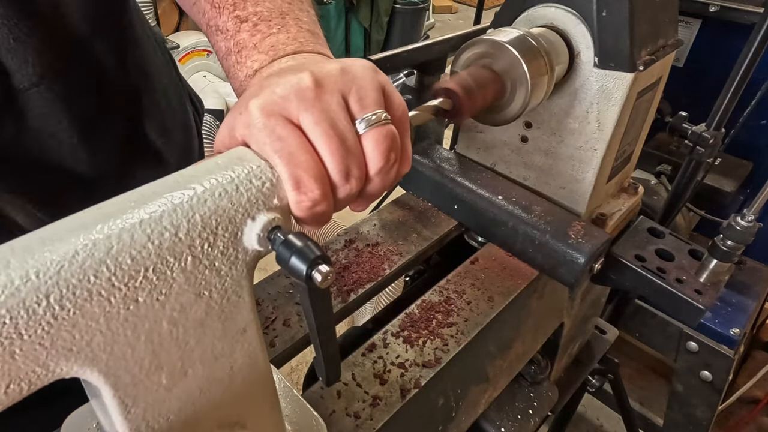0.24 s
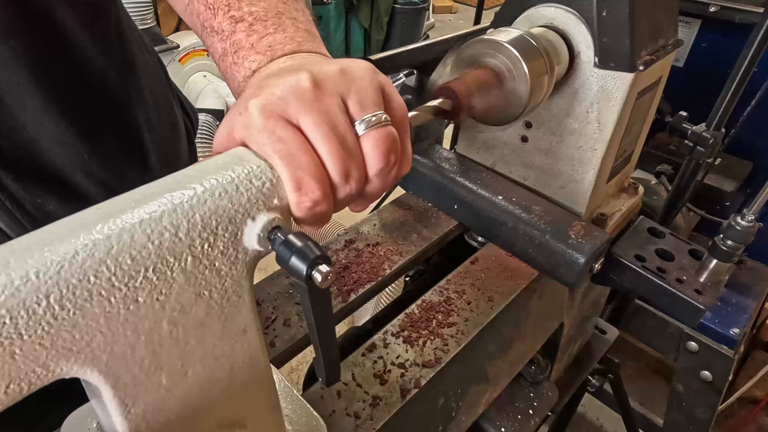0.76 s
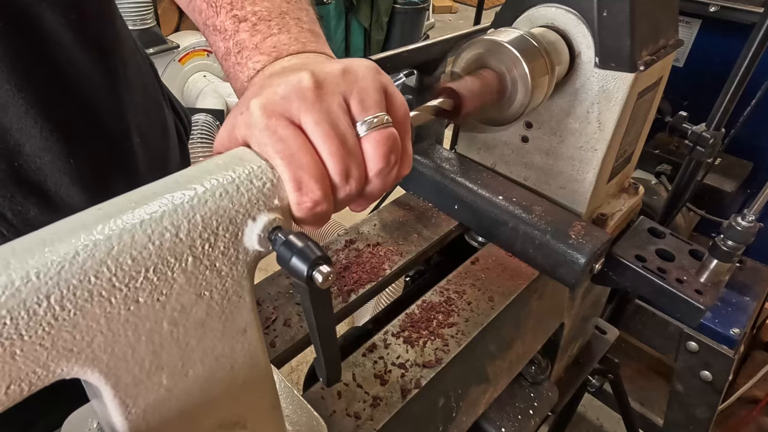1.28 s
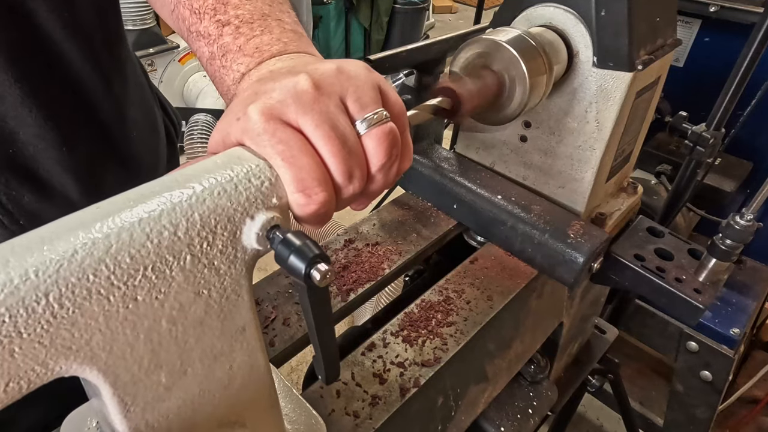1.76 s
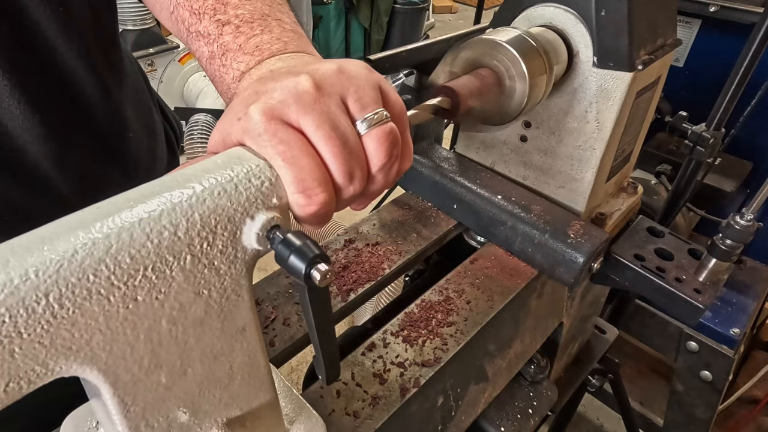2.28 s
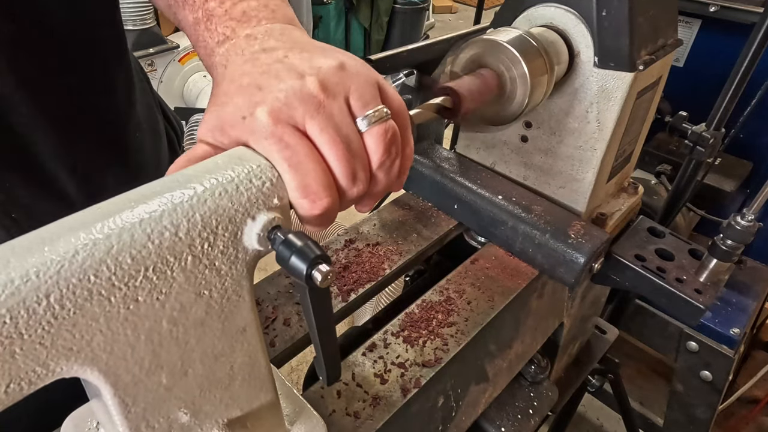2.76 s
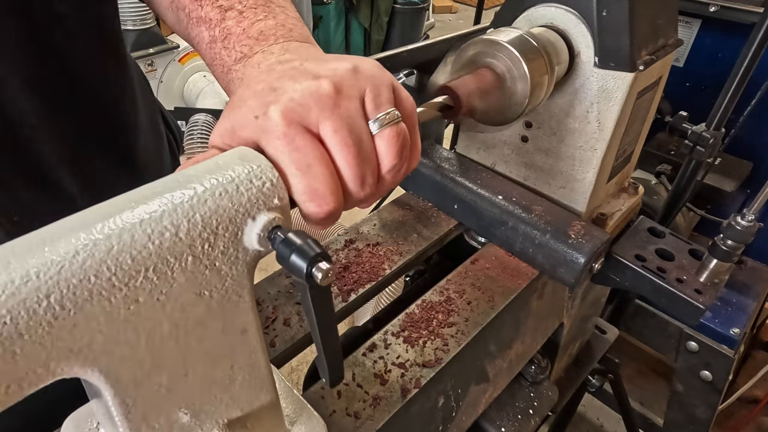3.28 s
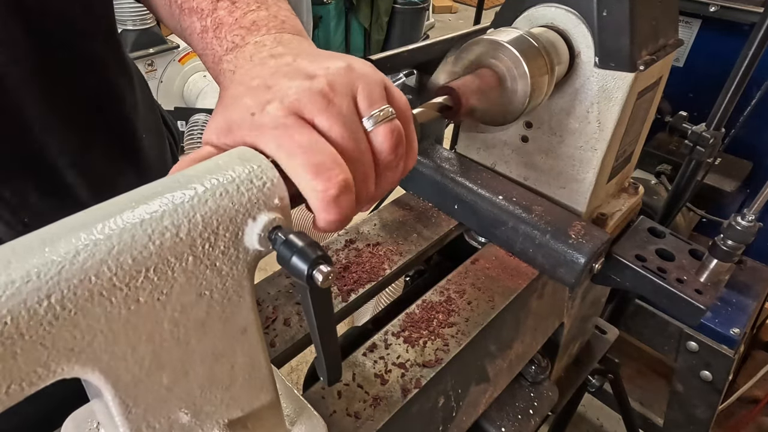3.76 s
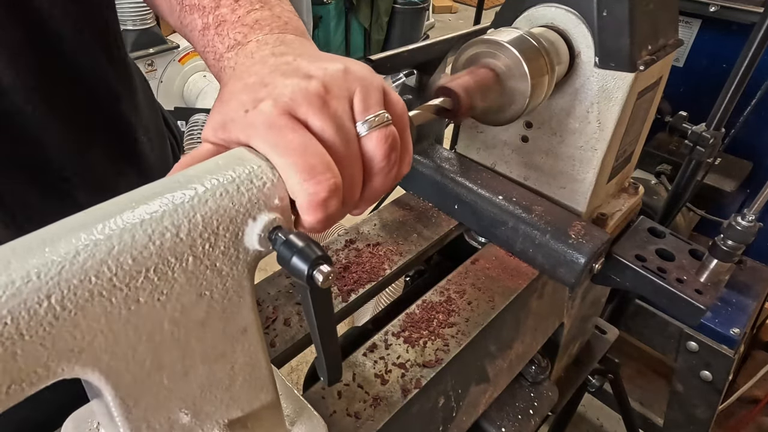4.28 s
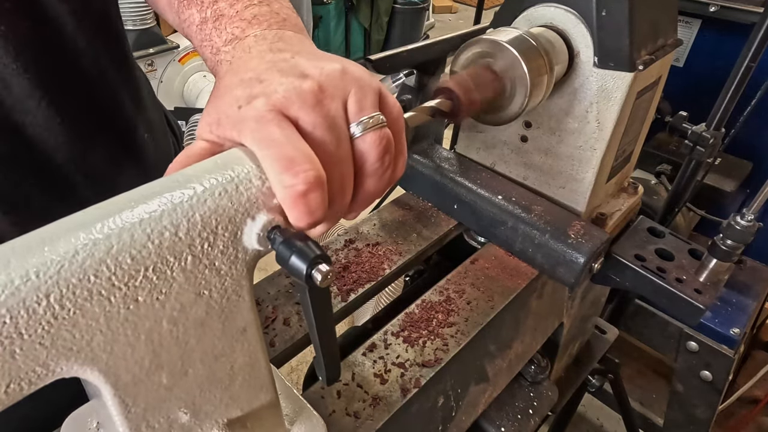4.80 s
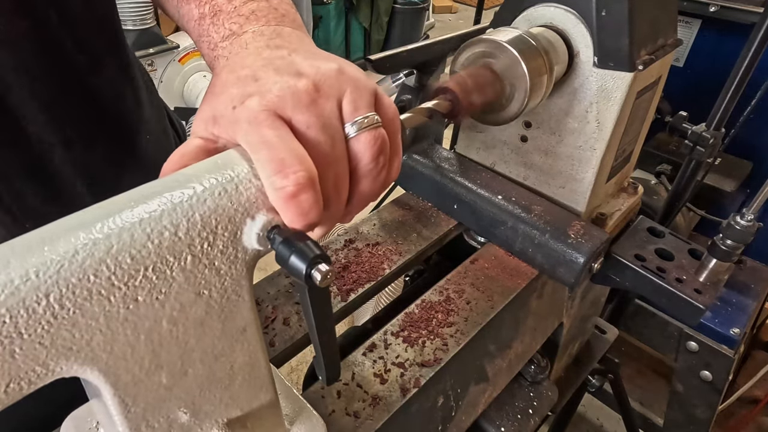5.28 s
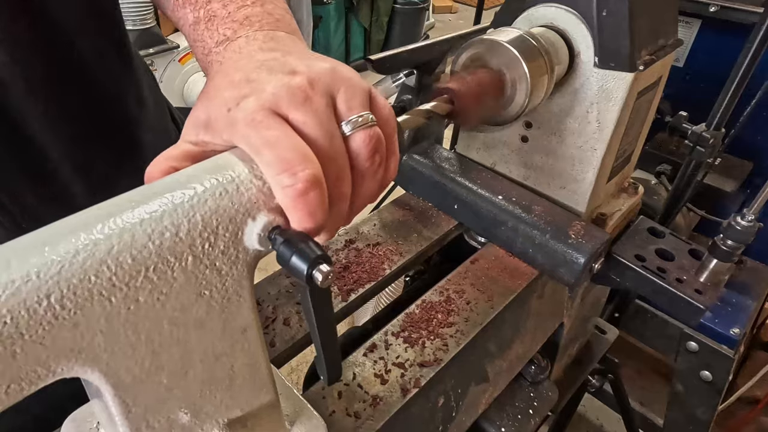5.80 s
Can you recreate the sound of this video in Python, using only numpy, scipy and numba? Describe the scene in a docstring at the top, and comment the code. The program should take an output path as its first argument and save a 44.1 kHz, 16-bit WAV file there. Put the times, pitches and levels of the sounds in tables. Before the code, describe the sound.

In a small workshop, a wood lathe drones while a drill bit scrapes into the spinning wood, close to the microphone. Sharp squeaks stutter at first as the lathe gathers speed. As the hole deepens, the sound grows hollow, with lower creaks and small crackling snaps of chips. Finally the bit breaks into a shrill, rapidly pulsing squeal, the loudest part.

```python
"""A twist drill, hand-fed from a lathe's tailstock, bores a spinning hardwood blank in a small workshop.
The bit starts out squeaking on every turn as the spindle gathers speed; the lips scrape the same grain
once a turn and the chuck drones. Chips tear, single squeaks break in, a thin whistle is gone by 2 s.
From 2.2 to 3.1 s the hole deepens and sounds hollower; squeaks become creaks. From 5.1 s the bit binds
and squeals on every turn. A close microphone limits the peaks throughout."""
import sys
import numpy as np
from scipy import signal
from scipy.fft import rfft, irfft, next_fast_len
from scipy.io import wavfile
from scipy.ndimage import map_coordinates
from numba import njit

SR = 44100
rng = np.random.default_rng(int(sys.argv[2]) if len(sys.argv) > 2 else 0)


def master(y):
    """Save y as 16-bit WAV."""
    cut = np.clip(np.atleast_2d(y).T, -1, 1)
    pcm = np.round(cut * 32767)  # scale
    wavfile.write(sys.argv[1], SR, pcm.astype(np.int16))


N = 266364
T = np.arange(N) / SR

# hand feed: time_s, scrape_db, body_db
FEED = [(0, -43, -56), (.25, -38, -60.5), (.42, -48, -54.5), (.7, -44.5, -53.5), (.85, -33, -51.5),
        (1.15, -43.5, -57), (1.4, -40.5, -51), (1.75, -46, -49), (2.14, -37, -43), (2.68, -39, -43),
        (2.8, -45, -47.5), (3.0, -39, -47.5), (3.5, -39.5, -47.5), (3.87, -44, -50.5), (4.45, -41.5, -49),
        (4.9, -38.5, -47.5), (5.4, -36.5, -45), (6.04, -40, -51.5)]
# hole, 0 shallow to 1 deep: time_s, depth
DEPTH = [(2.2, 0), (3.1, 1)]
# binding bit; throaty at the hole's mouth, hoarse deep inside, piercing at the bottom: freq_hz, gain_db
SQUAWK_SPECTRUM = [(500, -50), (900, -32), (1350, -6), (1680, 1), (1830, -0.5), (2050, 0.5), (2400, -11),
                   (3200, -6.5), (3650, -0.5), (4100, -3.5), (4750, -20.5), (5700, -8), (6150, -12.5),
                   (6650, -17), (7350, -13), (8200, -28), (10000, -25.5), (11800, -18.5), (14000, -40)]
CREAK_SPECTRUM = [(150, -26), (600, -39), (900, -28), (1200, -3), (1480, 2.5), (2000, -0.5), (2600, -14.5),
                  (3100, 5.5), (3800, -12.5), (4450, -6), (5200, -26), (6100, -10.5), (7300, -20),
                  (10000, -27.5), (12000, -21.5), (14000, -44)]
SQUEAL_SPECTRUM = [(100, -18.5), (500, -27.5), (900, -20.5), (1400, -6.5), (1900, 3.5), (2450, -8.5),
                   (3000, -5.5), (3800, -3), (4400, -7), (5050, -26), (6000, -6), (6700, -11), (7900, -14),
                   (10300, -30), (11900, -16.5), (14000, -42.5)]
# voices: spectrum, roughness, rub_db
SQUAWK = (SQUAWK_SPECTRUM, 0.8, -9.5)
CREAK = (CREAK_SPECTRUM, 1.48, -9)
SQUEAL = (SQUEAL_SPECTRUM, 0.75, -7.5)
SHALLOW_GLIDE_S, DEEP_GLIDE_S = 0.007, 0.0044  # a deep hole steadies the bit sooner


def undb(db):
    """Decibels to gain."""
    return 10 ** (np.asarray(db) / 20)


def unit(x):
    """Scale to rms 1."""
    return x / np.sqrt(np.mean(x ** 2))


def curve(table, column=1):
    """One column, interpolated over the scene."""
    rows = np.array(table)
    return np.interp(T, rows[:, 0], rows[:, column])


def row_at(table, time_s):
    """All value columns, interpolated at time_s."""
    times, *columns = np.transpose(table)
    return [np.interp(time_s, times, column) for column in columns]


def gain_at(hz, spectrum):
    """Gain of a (freq_hz, gain_db) spectrum at hz."""
    freq_hz, gain_db = np.transpose(spectrum)
    return undb(np.interp(np.log(hz + 1e-9), np.log(freq_hz), gain_db))


def colour(x, spectrum, resonances=()):
    """Filter by a spectrum and optional resonances."""
    size = next_fast_len(len(x) + 4096)
    hz = np.arange(size // 2 + 1) * SR / size
    peaks = 1 + sum(undb(db) / (1 + 2j * (hz - centre) / width) for centre, width, db in resonances)
    return irfft(rfft(x, size) * gain_at(hz, spectrum) * peaks, size)[:len(x)]


def wander(rate_hz, size):
    """Smooth noise, spread near 1."""
    knots = rng.standard_normal(size // 8 + 4)
    return map_coordinates(knots, [np.arange(size) * rate_hz / SR], order=2, mode="wrap")


def add(out, start_s, x):
    """Mix x in at start_s."""
    start = int(np.clip(start_s * SR, 0, N - 1))
    out[start:start + len(x)] += x[:N - start]


def each_turn(turns, start_s, end_s):
    """Times at which the same grain comes round."""
    first, last = np.interp([start_s, end_s], T, turns)
    return np.interp(np.arange(first, last), turns, T)


def pulse(turns, centre, width):
    """Smooth 0-1 pulse once a turn; centre and width in turns."""
    return np.exp(-(((turns - centre + .5) % 1 - .5) / width) ** 2)


def shop_noise():
    """Steady background of the shop."""
    # freq_hz, gain_db
    spectrum = [(15, -56), (25, -18.5), (225, -13), (335, -5), (485, -18), (916, -10), (1730, -4.5),
                (3100, -4.5), (4730, -29.5), (6850, -24), (8930, -41), (11300, -28.5), (14000, -39)]
    return unit(colour(rng.standard_normal(N), spectrum)) * undb(-52.5)


def grain(turns, memory, spiky_db, cells=1500):
    """Roughness round the hole's bottom: each turn meets part of what the last one left."""
    fresh = rng.standard_normal((int(turns[-1]) + 12, cells))
    fresh *= undb(spiky_db * rng.standard_normal(fresh.shape))
    surface = signal.lfilter([1], [1, -memory], fresh, axis=0)[10:]
    return unit(map_coordinates(surface.ravel(), [turns * cells], order=3))


def lips(turns):
    """Each lip digs into the end grain once a turn and eases off."""
    # place_turns, fade_turns, strength_db
    digs = [(0.071, 0.15, 5), (0.499, 0.036, 3.5)]
    return unit(1 + sum(undb(db) * np.exp(-((turns - place) % 1) / fade) for place, fade, db in digs))


def bite(turns, centre, swing_db):
    """The off-centre bit presses harder once a turn."""
    return unit(undb(swing_db * np.cos(2 * np.pi * (turns - centre))))


def cutting(turns):
    """Fibres snap under the lips and the lathe's body shakes; a deep hole is hollower and less even."""
    # freq_hz, gain_db
    scrape_spectrum = [(530, -55), (900, -30.5), (975, -20.5), (1260, 2), (1700, 8), (2180, 10),
                       (2870, -1.5), (3330, -22), (3610, -8), (4650, -16.5), (5920, -17), (8950, -30.5),
                       (11300, -31), (14000, -37)]
    body_spectrum = [(53, -70), (90, -21), (187, -11), (231, -15), (344, -3.5), (378, -1.5), (442, -0.5),
                     (471, -9), (672, -4), (731, -7), (856, -4), (970, -18.5), (1100, -6), (1430, -57),
                     (2420, -120)]
    deep_hole_filter = [(80, -2), (150, 8.5), (300, 5.5), (430, 1.5), (700, 3.5), (1100, 4.5), (1400, 4),
                        (1900, -6), (2300, -1), (3000, -6.5), (5000, -6), (10000, 1.5)]
    # lathe and blank: centre_hz, width_hz, gain_db
    resonances = [(322.6, 24, -1.5), (351.7, 16, -1), (425.5, 9.1, 6), (672, 14, 2.5), (1217, 106, 4.5),
                  (1747, 31, 4.5), (2180, 42, -13.5), (2774, 32, 5.5), (3070, 38, 13.5), (3550, 90, 5)]
    depth = curve(DEPTH)
    fibres = grain(turns, memory=.9, spiky_db=3.5) * lips(turns)
    scrape = unit(colour(fibres, scrape_spectrum, resonances)) * undb(curve(FEED))
    shake = unit(colour(grain(turns, memory=0.48, spiky_db=0), body_spectrum, resonances))
    shake *= bite(turns, centre=0.24, swing_db=0.9)
    body = shake * undb(-5 + 2.1 * depth) + drone(turns) * undb(-5.5 - 5.5 * depth)
    cut = scrape + body * undb(curve(FEED, column=2))
    return (1 - depth) * cut + depth * colour(cut, deep_hole_filter)


def drone(turns, waver_db=2.5):
    """The unbalanced chuck shakes the lathe at multiples of the spindle speed."""
    # spindle_multiple, relative_db
    harmonics = [(9, -14), (11, -6), (12, -1), (14, -10), (15, -3.5), (19, -14), (20, -14), (22, -13),
                 (23, -9.5), (24, -13), (26, -12), (29, -8), (36, -11), (37, -11)]
    out = np.zeros(N)
    for multiple, db in harmonics:
        gain = undb(db + waver_db * wander(4.16, N))
        out += gain * np.cos(2 * np.pi * (multiple * turns + rng.random()))
    return unit(out)


def squeak(voice, first_hz, settled_hz, glide_s, length_s, tilt_db_oct, even_db,
           free_db=-11.5, rise_s=0.0053, fall_s=0.0021, free_hz=2435, free_s=0.0044):
    """The bit rings freely, then sticks and slips; its pitch bends, locks to a twisting mode, lets go."""
    spectrum, roughness, rub_db = voice
    t = T[:SR // 25]
    hz = settled_hz + (first_hz - settled_hz) * np.exp(-.5 * (t / glide_s) ** 2)
    hz *= 1 + .028 * roughness * wander(1429, len(t))
    phase = 2 * np.pi * np.cumsum(hz) / SR
    grab = np.minimum(t / rise_s, 1) ** 1.85
    hold = np.exp(-np.maximum(t - length_s + fall_s, 0) / fall_s)
    free_envelope = undb(free_db) * np.sin(np.pi * np.minimum(t / free_s, 1))
    tone = free_envelope * np.sin(2 * np.pi * (free_hz * t + rng.random()))
    for k in range(1, 11):  # upper partials flutter more, smear and let go first
        tilt_db = np.log2(k) * (tilt_db_oct + 1.3 * wander(317, len(t)))
        gain = gain_at(k * hz, spectrum) * undb(even_db * (k % 2 == 0) + tilt_db)
        smear = .032 * roughness * k ** 2 * wander(1358, len(t)) + rng.uniform(0, 2 * np.pi)
        tone += gain * grab * hold ** (k ** 2.6) * np.sin(k * phase + smear) * (k * hz < SR / 2)
    slip_puffs = unit(colour(rng.standard_normal(len(t)) * (1 + np.cos(phase)), spectrum))
    return tone + roughness * undb(rub_db + tilt_db_oct / 2) * slip_puffs * grab * hold ** 2


def chatter(turns, run, voice, start_s, first_hz, glide_s, even_db, scatter_db=0.5, detune=.012):
    """One squeak a turn while the bit binds, no two alike."""
    out = np.zeros(N)
    for time_s in each_turn(turns, start_s, run[-1][0]):
        db, hz, length_s, tilt_db_oct, free_db, rise_s = row_at(run, time_s)
        softer, sharper = rng.standard_normal(2)
        hz *= 1 + detune * sharper
        stroke = squeak(voice, first_hz, hz, glide_s, length_s, tilt_db_oct, even_db, free_db, rise_s)
        add(out, time_s, undb(db - scatter_db * softer) * stroke)
    return out


def mouth_squawks(turns):
    """The bit binds on every turn at the hole's mouth."""
    # time_s, level_db, settled_hz, length_s, tilt_db_oct, free_db, rise_s
    run = [(0, -22.5, 2130, 0.015, 1, -14, 0.0022), (0.267, -26.5, 2112, 0.0177, 1, -17, 0.0017)]
    return chatter(turns, run, SQUAWK, start_s=0, first_hz=1660, glide_s=SHALLOW_GLIDE_S, even_db=-5)


def rubbing(turns, memory=0.79, sag=0.22):
    """The flutes rub the grain and ring one mode of the bit; pitch sags as the leading lip digs in."""
    # time_s, nominal_hz, level_db
    mode = [(0, 1927, -35), (.3, 1923, -40.5), (.45, 2171, -48.5), (.68, 2207, -49), (.77, 2190, -36),
            (.9, 1965, -38.5), (1.4, 1914, -40), (1.62, 1933, -67), (2.2, 2100, -45.5), (3.2, 2312, -54.5),
            (4.5, 2860, -58), (4.85, 2818, -40.5), (5.1, 2520, -42.5), (6.04, 2440, -43.5)]
    hz = curve(mode) * (1.06 - sag * pulse(turns, centre=0.3265, width=0.17))
    cycles = np.cumsum(hz) / SR
    phase = 2 * np.pi * (cycles - np.interp(np.floor(turns), turns, cycles))  # restarts each turn
    ring = unit(sum(grain(turns, memory, spiky_db=-2, cells=12) * wave(phase)
                    for wave in (np.sin, np.cos)))
    ring *= 1 - pulse(turns, centre=0, width=.04)
    return ring * lips(turns) * bite(turns, centre=0.47, swing_db=5) * undb(curve(mode, column=2))


def whistle(turns, pitch_hz=5143, sag=0.044, scoop_turns=0.071, fade_turns=0.53):
    """A steel mode of the shank, rubbed once a turn, scoops up to pitch with a rasp and fades."""
    # time_s, level_db
    levels = [(.2, -54), (.42, -45.5), (.68, -51.5), (.9, -48.5), (1.08, -63), (1.2, -46), (1.36, -59.5),
              (2, -74)]
    age_turns = (turns - 0.43) % 1
    scoop = np.exp(-age_turns / scoop_turns)
    phase = 2 * np.pi * np.cumsum(pitch_hz * (1 - sag * (scoop - scoop_turns))) / SR
    hiss = wander(330, N) * np.sin(phase) + wander(330, N) * np.cos(phase)
    tone = (np.sin(phase) + .5 * hiss) / np.sqrt(2) + undb(-20) * np.sin(2 * phase)
    envelope = unit((1 - scoop) * np.exp(-age_turns / fade_turns))
    return tone * undb(curve(levels)) * envelope


def swish(turns, low_hz=6000, high_hz=9000, width_hz=500, length_turns=.7):
    """A faint, breathy chirp rises once a turn."""
    progress = np.minimum((turns - .25) % 1 / length_turns, 1)
    phase = 2 * np.pi * np.cumsum(low_hz + (high_hz - low_hz) * progress) / SR
    hiss = wander(width_hz, N) * np.sin(phase) + wander(width_hz, N) * np.cos(phase)
    return hiss * np.sin(np.pi * progress) * undb(-71 + 3 * wander(25.2, N))


def chip(time_s, rise_s=0.00098, hold_s=0.012, fall_s=0.0044, snap_s=0.0004,
         shallow_hz=1750, deep_hz=1520):
    """A chip snaps twice and rasps off while the bit groans; duller and lower from a deep hole."""
    # freq_hz, gain_db
    tear_spectrum = [(100, -55), (350, -34.5), (600, -18), (891, -10), (1740, -2), (2300, -1), (3200, -3.5),
                     (4280, -14), (6870, -18), (8480, -56.5), (10800, -31), (14000, -66)]
    t = T[:SR // 25]
    depth, = row_at(DEPTH, time_s)
    envelope = np.minimum(t / rise_s, 1) * np.exp(-np.maximum(t - hold_s, 0) / fall_s)
    crackle = rng.standard_normal(len(t)) * undb(2.5 * wander(1500, len(t)))
    treble_cut = [(2500, 0), (5000, -3 - 7 * depth)]
    rasp = envelope * unit(colour(colour(crackle, tear_spectrum), treble_cut))
    snap_times_s = rng.uniform([.001, .004], [.003, .007])
    snap_envelope = sum(np.exp(-np.abs(t - at_s) / snap_s) for at_s in snap_times_s)
    hz = (shallow_hz + depth * (deep_hz - shallow_hz)) * (1 + 0.038 * rng.standard_normal())
    groan = squeak(CREAK, .82 * hz, hz, DEEP_GLIDE_S, length_s=0.012, tilt_db_oct=-13, even_db=2.5)
    snaps = snap_envelope * unit(colour(rng.standard_normal(len(t)), tear_spectrum))
    return undb(-3) * rasp + undb(2) * snaps + groan


def catches(turns, chance=0.48, below_feed_db=6, scatter_db=2):
    """The lips catch: small chips on random turns, scaled by the feed, and big ones at set times."""
    # start_s, level_db
    big_chips = [(0.537, -39.5), (0.7638, -38), (1.131, -44), (1.164, -35.5), (1.202, -43), (1.274, -44),
                 (1.378, -41), (2.4473, -39), (2.489, -39), (2.652, -31), (2.688, -27.5), (2.9662, -33),
                 (2.9997, -33), (3.0324, -34.5), (3.174, -39.5), (3.899, -45.5), (3.9304, -37.5),
                 (4.065, -33.5), (4.2042, -37), (4.339, -31), (4.613, -40.5), (4.65, -47), (4.684, -38),
                 (4.787, -35.5), (4.821, -43), (4.9229, -32.5), (4.956, -39)]
    out = np.zeros(N)
    times_s = each_turn(turns, 0, T[-1])
    for start_s, luck, size in zip(times_s, rng.random(len(times_s)), rng.standard_normal(len(times_s))):
        feed_db, _ = row_at(FEED, start_s)
        gain = undb(feed_db - below_feed_db + scatter_db * size)
        add(out, start_s, chip(start_s) * gain * (luck < chance))
    for start_s, db in big_chips:
        add(out, start_s, chip(start_s) * undb(db))
    return out


def drive(turns):
    """Motor and belt tones, locked to the spindle, swell under load and fade; a short ring near 1220 Hz sounds
    with the catch at 4.93 s."""
    # spindle_multiple, one per swell
    multiples = [16, 26.5, 12, 42, 60, 75, 42, 42]
    # start_s, end_s, level_db
    swells = [(0.33, 1.13, -55), (1.11, 1.46, -57.5), (1.1, 3, -52), (1.8, 2.66, -62), (1.4, 4.4, -51.5),
              (1.9, 2.37, -49), (4.93, 5, -45), (3.98, 4.11, -47)]
    out = np.zeros(N)
    for multiple, (start_s, end_s, db) in zip(multiples, swells):
        swell = np.sin(np.pi * np.clip((T - start_s) / (end_s - start_s), 0, 1))
        gain = np.sqrt(2) * undb(db + 0.63 * wander(4.5, N))
        out += gain * swell * np.sin(2 * np.pi * multiple * turns)
    return out


def single_squeaks():
    """The bit binds for one turn: falling pitches squeal, rising ones squawk or, once deep, creak."""
    # start_s, level_db, first_hz, settled_hz, length_s, tilt_db_oct, even_partials_db
    binds = [(0.802, -17, 1259, 2056, 0.014, -1, -1.5), (0.874, -18, 1696, 2076, 0.015, 1.5, -8),
             (0.949, -21, 1684, 2010, .015, 1.5, -6), (.986, -21.5, 1726, 1963, 0.015, 1, -6.5),
             (1.0588, -19.5, 1713, 1990, 0.014, 1.5, -7), (1.413, -19, 1665, 2037, .016, 0, -6),
             (2.722, -17.5, 1500, 1957, 0.01605, -1, 1.5), (3.204, -20.5, 1040, 1627, 0.015, -1, 4.5),
             (3.378, -18.5, 1036, 1515, .014, -2, 0), (3.448, -17, 1030, 1476, .014, -3.5, 2.5),
             (3.515, -18.5, 1059, 1470, 0.016, -1, 1.5), (3.653, -22, 1158, 1496, 0.016, -0.5, 0.5),
             (3.722, -20.5, 1130, 1510, 0.016, -2, 4.5), (4.1, -21, 1206, 1542, 0.014, -1, 0),
             (4.969, -19.5, 2910, 2420, 0.013, -45, 4), (5.002, -16.5, 2410, 2050, 0.018, -1.5, -3.5),
             (5.04, -13, 2304, 2016, 0.014, -1.5, -6), (5.105, -17.5, 2890, 2210, 0.015, -29, 0)]
    out = np.zeros(N)
    for start_s, db, first_hz, settled_hz, length_s, tilt_db_oct, even_db in binds:
        depth, = row_at(DEPTH, start_s)
        voice, glide_s = (CREAK, DEEP_GLIDE_S) if depth == 1 else (SQUAWK, SHALLOW_GLIDE_S)
        if first_hz > settled_hz:
            voice = SQUEAL
        stroke = squeak(voice, first_hz, settled_hz, glide_s, length_s, tilt_db_oct, even_db)
        add(out, start_s, undb(db) * stroke)
    return out


def bottom_squeals(turns):
    """The bit binds on every turn at the hole's bottom."""
    # time_s, level_db, settled_hz, length_s, tilt_db_oct, free_db, rise_s
    run = [(5.137, -14.5, 2046, 0.018, -0.43, -2, 0.00763), (5.449, -14, 1935, 0.017, 0.89, -5, 0.0032),
           (5.74, -16, 1912, 0.015, 3, -9, 0.0032), (5.87, -15.5, 1927, .012, 0.5, 1, 0.0058),
           (6.03, -11, 1982, 0.0093, -0.51, -8, 0.0073)]
    return chatter(turns, run, SQUEAL, start_s=5.138, first_hz=2492, glide_s=0.00223, even_db=-3.5)


def workshop(x, low_t60_s=0.33, high_t60_s=0.4, early_decay_s=0.004):
    """Quick, dull echoes off the lathe bed and bench, then a cluttered room's tail."""
    # delay_s, gain_db
    reflections = [(.0029, -8), (.00413, -10.5), (.00628, -29), (.0099, -7), (0.0181, -11)]
    t = T[:SR * 2 // 3]
    low = colour(rng.standard_normal(len(t)), [(4000, 1.5), (8000, -52)])
    high = colour(rng.standard_normal(len(t)), [(4000, -2.5), (8000, -4.0)])
    tail = low * undb(-60 * t / low_t60_s) + high * undb(-60 * t / high_t60_s)
    tail *= np.minimum(t / 0.0024, 1)
    early = rng.standard_normal(len(t)) * np.exp(-t / early_decay_s) * (t > .003)
    response = (undb(-7.5) * unit(tail) + undb(-14) * unit(early)) / np.sqrt(len(t))
    echoes = sum(undb(db) * np.interp(T - delay_s, T, x, left=0) for delay_s, db in reflections)
    return x + colour(echoes, [(2500, -2.0), (9000, -11.0)]) + signal.fftconvolve(x, response)[:N]


def scene():
    """Drilling from one spot over the shop's noise, in stereo."""
    # time_s, turns_per_s
    spindle_speed = [(0, 23.7), (.25, 24.1), (.8, 26.7), (1.415, 28.85), (1.6, 29.1), (5.6, 29.1),
                     (6.04, 28.3)]
    # the microphone's two sides part, mostly in the treble: freq_hz, side_gain_db
    stereo_width = [(30, -19), (120, -19), (300, -44), (2000, -81), (5500, -22.5), (8000, -22),
                    (12000, -3.5)]
    turns = np.cumsum(curve(spindle_speed)) / SR
    background = shop_noise()
    binding = mouth_squawks(turns) + bottom_squeals(turns) + single_squeaks()
    bit = binding + catches(turns) + rubbing(turns) + whistle(turns) + swish(turns)
    mid = workshop(bit) + cutting(turns) + drive(turns) + background
    side = colour(mid, stereo_width) * wander(200, N)  # left-right shimmer
    return np.array([mid + side, mid - side])


@njit
def follow_peaks(x, attack_s, release_s):
    """Peak follower: quick up, slow down."""
    attack = 1 - np.exp(-1 / (attack_s * SR))
    release = 1 - np.exp(-1 / (release_s * SR))
    out, level = np.empty(len(x)), 0.
    for i in range(len(x)):
        level += (x[i] - level) * (attack if x[i] > level else release)
        out[i] = level
    return out


def record(dry, limit_db=-22.5, attack_s=.0003, release_s=0.11, cutoff_hz=14350):
    """The microphone colours the treble, a limiter ducks the squeaks, a low-pass cuts the top."""
    # freq_hz, gain_db
    mic_response = [(100, 0.5), (8200, -3.5), (9100, -8.5), (9800, 1.5), (12500, -1), (14000, -6)]
    x = np.array([colour(channel, mic_response) for channel in dry])
    peak = follow_peaks(np.abs(x).mean(axis=0), attack_s, release_s)
    limited = x / np.maximum(peak / undb(limit_db), 1)
    return signal.sosfilt(signal.ellip(8, .2, 70, cutoff_hz, fs=SR, output="sos"), limited)


dry = scene()
out = record(dry)
master(out)
```